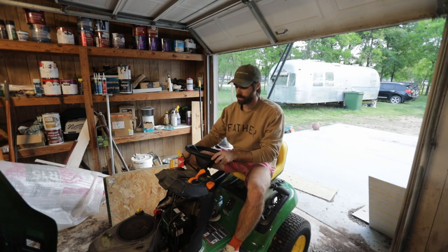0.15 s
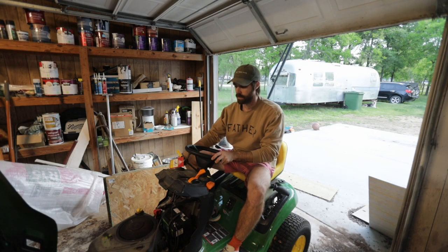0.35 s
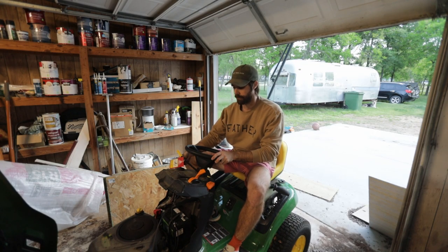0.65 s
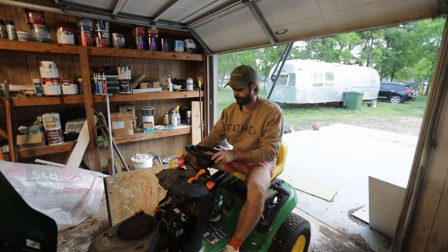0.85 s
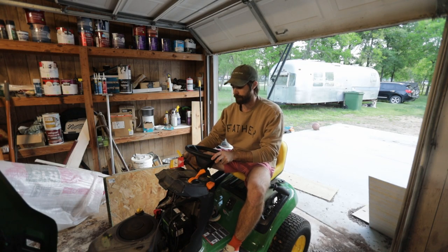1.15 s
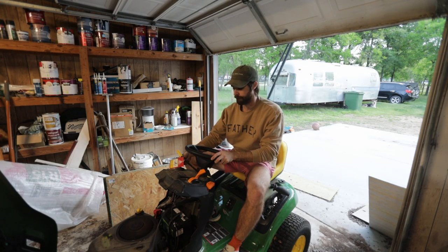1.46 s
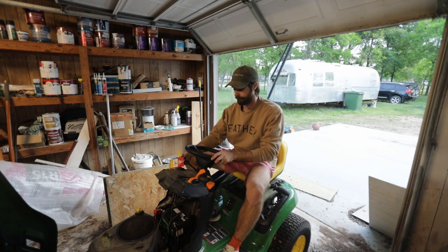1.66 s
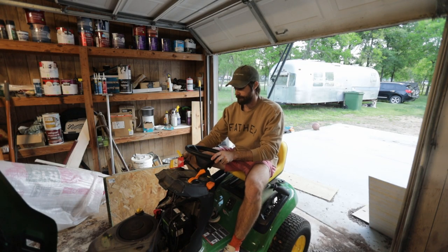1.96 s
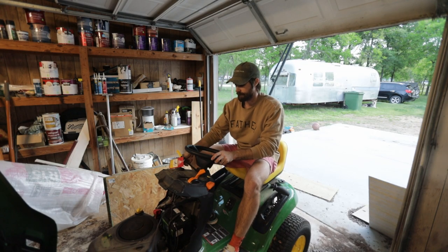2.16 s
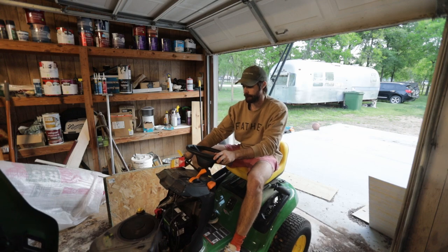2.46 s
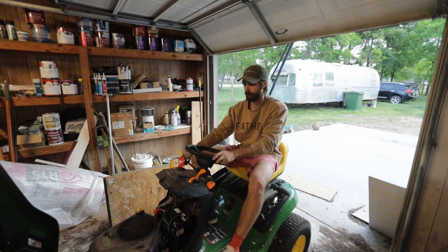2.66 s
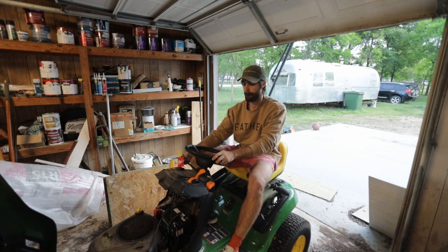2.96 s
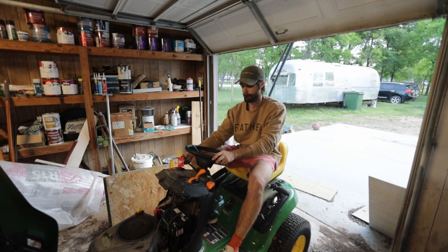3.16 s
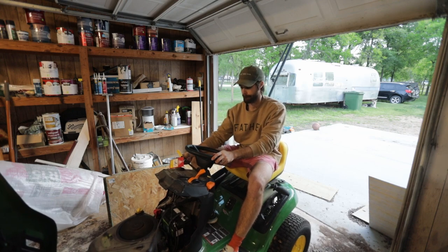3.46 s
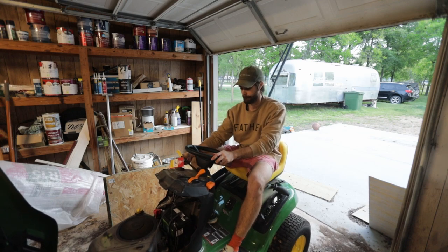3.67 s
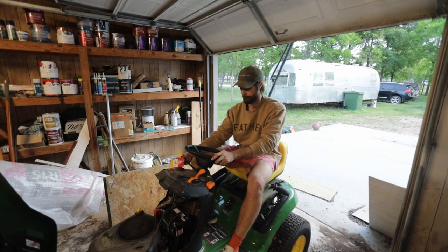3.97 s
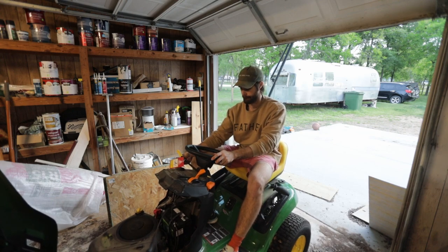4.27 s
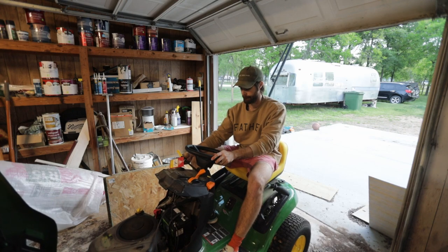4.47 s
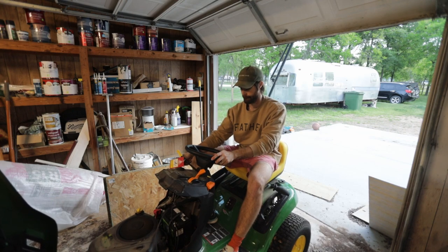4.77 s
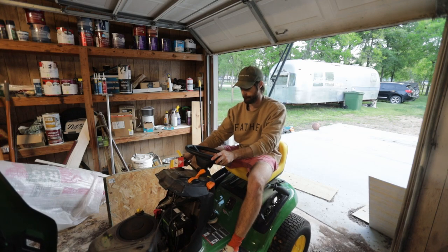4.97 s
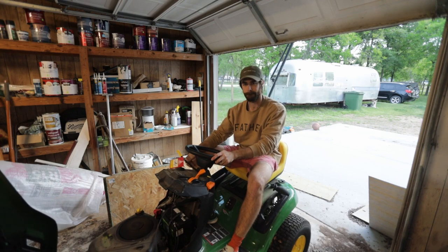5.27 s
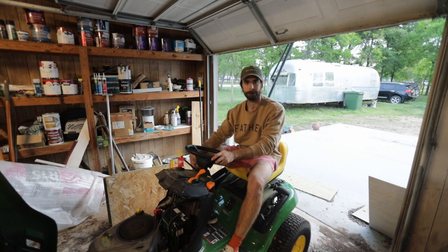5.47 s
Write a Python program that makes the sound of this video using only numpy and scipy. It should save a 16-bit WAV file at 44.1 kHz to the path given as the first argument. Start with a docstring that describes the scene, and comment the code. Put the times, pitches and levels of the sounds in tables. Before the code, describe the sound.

A one-cylinder riding mower is heard closely in an open garage, with short reverberation from shelves and walls and very faint outdoor air. From 0 to 0.4 s, the engine rocks to rest with soft rattles and clacks; tiny creaks follow around 0.5-0.6 s. At 0.7 s the starter slams in with a loud, bright clank and hollow boom. Gritty grinding, whine and small squeaks run until 2.2 s, surging with heavy knocks and low puffs about six times a second. The starter lets go; soft clacks and a weak last knock come at 2.3-2.5 s, then near quiet. A softer clunk at 3.05 s begins a second, similar crank. At about 4.7 s the engine catches with a metallic bang. Rapid low exhaust thuds, about twelve a second, continue to the end with ticking and gradually easing clatter, panels singing briefly stronger around 5.1 s.

```python
"""Cranking and idle of a one-cylinder mower

In an open garage a riding mower's engine rocks to rest from an earlier try, then is cranked twice.
Struck modes give knocks, booms and the bang; trains of brief contacts, filtered by the casing, give gear noise.
Sines give the starter's whine; gas pulses on several paths give the puffs and thuds of the exhaust.
The first go dies away; on the second the engine catches with a bang and settles into a slow, thudding idle."""
import sys
import numpy as np
from scipy import signal
from scipy.fft import rfft, irfft, next_fast_len
from scipy.io import wavfile
from scipy.ndimage import uniform_filter1d

SR = 44100
rng = np.random.default_rng(int(sys.argv[2]) if len(sys.argv) > 2 else 0)


def transcribe(signal):
    """Save signal, clipped to [-1, 1], as a 16-bit WAV file at the path in sys.argv[1]."""
    frames = np.atleast_2d(signal).T
    limited = np.clip(frames, -1, 1)
    pcm = np.round(limited * 32767).astype(np.int16)
    wavfile.write(sys.argv[1], SR, pcm)


N = 247742
TIME = np.arange(N) / SR   # s

# Piston passing over compression: start_s, strength_db
COMPRESSIONS = [(0.198, -14.5), (0.8, -7.5), (1.02, -1.5), (1.201, 0), (1.373, 1), (1.539, 1), (1.705, 0),
                (1.87, 0), (2.036, 0), (2.206, -1.5), (2.474, -8.5), (3.262, -2), (3.453, 2.9),
                (3.624, 0.2), (3.79, 0.8), (3.955, 0.5), (4.119, -0.4), (4.282, -0.5), (4.446, 0.2),
                (4.609, 0.9), (4.731, -1)]
# Solenoid and pinion slamming home: start_s, clank_db, crack_db, boom_db, t60_s
BLOWS = [(0.689, -13.5, -23, -33, 0.14), (0.707, 2, -4, -6.5, 0.077), (0.721, -12.5, -47.5, -4.5, 0.09),
         (3.029, -12.5, -18.5, -22.5, 0.058), (3.047, -4.5, -14, -14, 0.067),
         (3.06, -14.5, -40, -9.5, 0.086)]
# Firings of the engine: start_s, thud_db, tick_db
FIRINGS = [(4.667, -6.5, -16), (4.777, -6, -17), (4.86, -2.5, -19.5), (4.9378, -3.5, -25), (5.013, -3, -23),
           (5.084, -3, -23), (5.161, -6.5, -29), (5.2397, -3.5, -20), (5.3193, -5.5, -27.5),
           (5.4082, -8, -30), (5.5016, -4.5, -25), (5.591, -6, -21.5)]
# Gears clacking across their backlash as the crank rocks or kicks: start_s, clack_db, edge_db
CLACKS = [(0.018, -26, -53), (0.055, -20, -55), (0.118, -30, -53), (0.173, -22.5, -52), (0.211, -44, -42),
          (0.3, -28.5, -65), (0.393, -20, -44), (2.34, -25, -58), (2.366, -24.5, -39), (2.458, -17.5, -41),
          (2.491, -25.5, -45), (2.528, -25.5, -43), (4.666, -12.5, -14), (4.683, -3.5, -10.5),
          (4.746, -12.5, -18.5), (4.78, -30, -25)]
# Starter engaged: start_s, end_s, grind_db
CRANKS = [(0.707, 2.212, -20.5), (3.049, 4.716, -21.5)]
# Flywheel and valve gear coasting: start_s, end_s, level_db, fall_db_per_s (negative rises)
COASTS = [(0, 0.398, -25, 44), (2.24, 2.431, -32, -11)]
# Bearing creaks as the flywheel settles: start_s, pitch_hz, level_db
CREAKS = [(0.494, 9000, -61), (0.562, 3360, -46.5), (0.572, 9850, -54.5), (0.612, 9650, -57.5)]

# Ringing modes of the compression knock: pitch_hz, level_db, t60_s
KNOCK_MODES = [(405, -13, 0.08), (417.6, 0.5, 0.082), (470.6, -21.5, 0.23), (581, -20.5, 0.17)]
# Modes of the intake thump: pitch_hz, level_db, t60_s
INTAKE_MODES = [(147, -18, 0.14), (178.4, -4, 0.083), (243, -11, 0.092)]
# Modes of the flywheel housing: pitch_hz, level_db, t60_s
HOUSING_MODES = [(283, -18.5, 0.39), (351.6, 1.5, 0.29), (541, -36.5, 0.12), (613, -1.5, 0.2),
                 (757, 12.5, 0.057), (1356, -3.5, 0.087)]
# Low modes of the garage, rung by the exhaust: pitch_hz, level_db, t60_s
GARAGE_MODES = [(68, -18, 0.122), (125, -14, 0.19), (189, -12, 0.12), (221, -19, 0.06)]
# Modes of the bodywork, rung by the bang: pitch_hz, level_db, t60_s
BODYWORK_MODES = [(1512, -6, 0.083), (1390, -13, 0.067)]

# Resonances of the engine casing: pitch_hz, width_hz, level_db
CASING = [(398, 60, 6), (812, 270, 3), (1065, 10, -4), (1315, 39, -12.5), (1420, 64, -4.5), (1742, 51, 0.5),
          (2093, 50, 5), (2326, 56, 6), (2640, 17, 3), (3520, 130, -15.5), (3660, 260, -9.5),
          (4400, 110, -2.5), (4800, 31, -25.5)]
# Resonances of the idle clatter: pitch_hz, width_hz, level_db
IDLE_RESONANCES = [(422, 25, 10), (475, 35, -3), (790, 20, -19), (860, 29, -6), (1010, 8.4, 19),
                   (1600, 24, -3), (1710, 23, -13)]
# Resonances of the drive's squeak: pitch_hz, width_hz, level_db
SQUEAK_RESONANCES = [(8700, 510, -7), (9090, 100, 10), (9400, 360, -4)]
# Resonances of the valve gear: pitch_hz, width_hz, level_db
VALVE_RESONANCES = [(4430, 490, 6), (4850, 200, -3), (6900, 560, -1.5), (7900, 410, -13)]
# Panels that sing at idle: pitch_hz, width_hz, level_db
PANEL_RESONANCES = [(800, 21, -8), (881, 24, 0), (992, 8.8, 1)]

# Spectrum of grinding teeth: frequency_hz, density_db_per_hz
GRIND_COLOUR = [(88, -23), (150, -6), (254, -11.5), (361, 2), (414, 2), (559, -1), (1410, -7), (1540, -8.5),
                (1860, -10), (2310, -11.5), (2520, -9), (3000, -19), (3900, -49.5), (6600, -120)]
# Spectrum of the raspy tooth edges: frequency_hz, density_db_per_hz
RASP_COLOUR = [(2300, -24.5), (3100, 4), (3700, 4), (4400, 1.5), (5100, -0.5), (6000, -19), (8000, -28)]
# Spectrum of the treble tooth edges: frequency_hz, density_db_per_hz
TREBLE_COLOUR = [(4000, -21.5), (5800, 3), (8000, -2), (10000, -4), (11000, -15), (15500, -19)]
# Spectrum of the rattle at compression: frequency_hz, density_db_per_hz
RATTLE_COLOUR = [(150, -26.5), (250, -4.5), (442, 4.5), (603, 6.5), (742, -11.5), (1120, -0.5), (1310, 0.5),
                 (1790, -10.5), (2090, -7), (4030, -8.5), (8920, -19.5), (15500, -30.5)]
# Spectrum of the pinion's clank: frequency_hz, density_db_per_hz
CLANK_COLOUR = [(120, -22), (240, -2.5), (340, 5), (620, 2.5), (780, -1.5), (950, -5.5), (1400, 2),
                (2000, -5.5), (4200, -6.5), (6500, -23), (15000, -36.5)]
# Spectrum of bright impact edges: frequency_hz, density_db_per_hz
CRACK_COLOUR = [(500, -53), (2500, 5), (5000, 6), (9500, 2.5), (12000, -7), (15500, -8.5)]
# Spectrum of a backlash clack: frequency_hz, density_db_per_hz
CLACK_COLOUR = [(200, -1.5), (420, 0.5), (650, -4), (1000, -1.5), (1450, -4.5), (1900, -11), (2500, -8.5),
                (4200, -12), (6500, -20.5), (15000, -57)]
# Spectrum of the coasting rattle: frequency_hz, density_db_per_hz
COASTING_COLOUR = [(24, -34), (40, -13), (69, 8), (103, -16), (139, -6), (224, -13.5), (387, -2.5),
                   (577, -3.5), (722, -10), (1380, -5), (1960, -12.5), (2330, -13.5), (3060, -15),
                   (15500, -41.5)]
# Spectrum of the idle clatter: frequency_hz, density_db_per_hz
CLATTER_COLOUR = [(120, -5), (200, -6), (310, -11.5), (422, -4.5), (677, -9.5), (874, -6), (940, -10),
                  (1010, -5.5), (1110, -9.5), (1380, -8), (2800, -16), (4500, -19), (8350, -29.5),
                  (15500, -42.5)]
# Spectrum of air pumped through the muffler: frequency_hz, density_db_per_hz
DRAUGHT_COLOUR = [(40, -14), (55, 4.5), (75, -2), (100, -21), (140, -10), (200, -30.5)]
# Spectrum of the outdoor air: frequency_hz, density_db_per_hz
AIR_COLOUR = [(15, -42.5), (25, -28), (113, 3), (495, -14.5), (537, 2), (684, -21), (1300, -13),
              (1570, -21.5), (1710, -12), (2170, -25.5), (4040, -23), (5430, -33), (15500, -49.5)]

# Reverberation of the garage: frequency_hz, t60_s
GARAGE_T60 = [(100, 0.54), (400, 0.78), (1500, 0.48), (4000, 0.56), (9000, 0.14), (16000, 0.63)]
# Paths of an exhaust pulse from muffler, floor and walls: delay_s, gain
EXHAUST_PATHS = [(0, 0.37), (.0036, -0.69), (.0105, 0.52), (.0178, -0.62), (.0232, .65), (.031, -0.24)]

AIR_DB = -53
MIC_LOW_HZ, CUTOFF_HZ = 38.4, 15750
CLACK_RISE_S, CLACK_T60_S = 0.0043, 0.087

SPIN_UP_S, RUN_DOWN_S = .145, 0.019   # time to full speed; time constant of the fade after release
TEETH_PER_S = 1450   # contact rate approached as each go wears on
RASP_DB, TREBLE_DB = -27, -33   # tooth edges, before the changes below
GRIND_RISE_DB, RASP_RISE_DB, TREBLE_RISE_DB = 2, 23, 27.5   # gained from standstill to full speed
FRESH_S, FRESH_RASP_DB, FRESH_GRIND_DB = .35, 6, -2   # early in each go: thinner and raspier
EASE_S, EASE_DB = .06, 15   # the treble softens just before release
TURN_SWELL_DB, TURN_PEAK = 0.77, .3   # the mesh tightens once a turn; peak as share of the two-turn cycle
STROKE_SWELL_DB, STROKE_PEAK = -0.05, 0.043   # once a cycle; negative dips at that share of the cycle
WHINE_HZ, WHINE_SWING = 1422, 0.0219   # mean mesh pitch, and the share by which it swings with each turn
WHINE_DB, WHINE_START_DB, WHINE_START_S = -34.5, -28.5, 0.23   # steady part, and the starting strain
SQUEAK_AT, SQUEAK_DB, SQUEAK_VARY_DB = (0.266, .74), -24, 3.5   # dry spot, as shares of the cycle

KNOCK_DB, RATTLE_DB, THUMP_DB = -7.5, -11.5, -5   # at a compression of strength 0 dB
KNOCK_GROWTH = 1.3   # dB of knock for each dB of strength
BANG_S = 4.682
RUNS_FROM_S, CLATTER_DB, CLATTER_FALL_DB_PER_S = 4.74, -17, 5.5   # clatter eases as the engine settles
TICK_RISE_S, TICK_T60_S, TICK_EDGE_DB = 0.0058, 0.087, -9.5   # valve tick, and its bright edge
PANEL_DB, SURGE_DB = -34.5, 10   # panels at slow idle, and their gain in the surge
SURGE_S, SURGE_WIDTH_S = 5.08, 0.24


def from_db(db):
    """Level law: decibels to amplitude gain."""
    return 10 ** (np.asarray(db) / 20)


def rms_one(x):
    """Normalisation: scale to unit mean power."""
    return x / np.sqrt(np.mean(x ** 2) + 1e-20)


def at_hz(points, hz):
    """Logarithmic pitch scale: interpolate a table along log frequency."""
    frequency, value = np.transpose(points)
    return np.interp(np.log(hz + 1), np.log(frequency), value)


def flutter(window_s):
    """Random modulation: smoothed noise of rms 1."""
    return rms_one(uniform_filter1d(rng.standard_normal(N), int(window_s * SR) + 1))


def stretch(start, end, fade_s):
    """Exponential decay: a gain held between two times that fades outside them."""
    outside = np.maximum(start - TIME, 0) + np.maximum(TIME - end, 0)
    return np.exp(-outside / fade_s)


def coloured(spectrum, drive=None):
    """Spectral shaping: a drive (else white noise) takes a colour that falls away beyond its ends; rms 1."""
    drive = rng.standard_normal(N) if drive is None else drive
    size = next_fast_len(N)
    hz = np.fft.rfftfreq(size, 1 / SR)
    low_end = 1 + (spectrum[0][0] / (hz + 1)) ** 4
    high_end = 1 + (hz / spectrum[-1][0] / 2) ** 4
    shape = from_db(at_hz(spectrum, hz)) / low_end / high_end
    return rms_one(irfft(rfft(drive, size) * shape, size)[:N])


def resonate(x, peaks):
    """Forced resonance: two-pole bandpass filters in parallel."""
    out = np.zeros(N)
    for hz, width, db in peaks:
        r = np.exp(-np.pi * width / SR)
        poles = [1, -2 * r * np.cos(2 * np.pi * hz / SR), r * r]
        out += from_db(db) * (1 - r * r) / 2 * signal.lfilter([1, 0, -1], poles, x)
    return out


def ring(impulses, hz, t60):
    """Free vibration: each impulse starts a decaying sine."""
    r, w = np.exp(-np.log(1000) / (t60 * SR)), 2 * np.pi * hz / SR
    return signal.lfilter([0, np.sin(w)], [1, -2 * r * np.cos(w), r * r], impulses)


def clicks(times, db):
    """Impulsive excitation: one sample for each event."""
    out = np.zeros(N)
    out[np.clip((np.asarray(times) * SR).astype(int), 0, N - 1)] = from_db(db)
    return out + 1e-18


def strike(times, db, modes, vary_db):
    """Modal excitation: every blow rings each mode with a strength of its own."""
    out = np.zeros(N)
    luck = rng.standard_normal((len(times), len(modes)))
    for k, (hz, mode_db, t60) in enumerate(modes):
        out += ring(clicks(times, db + mode_db + vary_db * luck[:, k]), hz, t60)
    return out


def bursts(times, db, rise_s, t60):
    """Transient envelope: each event swells linearly, then decays exponentially."""
    out = np.zeros(N)
    for s, gain, decay in zip(times, from_db(db), t60 * np.ones(len(times))):
        start = max(int(s * SR), 0)
        age = TIME[:min(N - start, SR // 2)] if start < N else TIME[:0]
        rise = np.minimum(age / rise_s, 1)
        fall = np.exp(-np.log(1000) * np.maximum(age - rise_s, 0) / decay)
        out[start:start + len(age)] += gain * rise * fall
    return out


def contacts(per_s, spread_db, jitter, hiss):
    """Impact noise: an uneven train of touches, each about a millisecond of grit, with rubbing between."""
    count = np.cumsum(per_s * (1 + jitter * flutter(window_s=.005)) / SR)
    strength = from_db(spread_db * np.clip(rng.standard_normal(N), -2, 2))
    touch = np.abs(np.diff(np.floor(count), prepend=0)) * strength
    envelope = signal.lfilter([1], [1, -np.exp(-1 / (.0008 * SR))], touch)
    return rms_one(envelope * rng.standard_normal(N)) + hiss * rng.standard_normal(N)


def chatter(per_s, cycles, spread_db):
    """Free vibration of small parts: each tooth that catches rings one of many for a set count of cycles."""
    pitches = np.geomspace(1150, 6300, num=56)
    born = np.flatnonzero(rng.random(N) < per_s / SR)
    sizes = from_db(spread_db * np.clip(rng.standard_normal(N), -2, 2))[born]
    dealt = rng.integers(0, len(pitches), N)[born]
    out = np.zeros(N)
    for k, hz in enumerate(pitches):
        taps = clicks(born[dealt == k] / SR, 20 * np.log10(sizes[dealt == k]))
        out += ring(taps, hz, t60=cycles / hz)
    return rms_one(out)


def cased(spectrum, drive, peaks, ring_db):
    """Structural transmission: broad colour plus the resonances of a casing."""
    direct = coloured(spectrum, drive)
    return rms_one(direct + from_db(ring_db) * resonate(direct, peaks))


def outdoor_air():
    """Broadband background: faint, steady coloured noise."""
    return from_db(AIR_DB) * coloured(AIR_COLOUR)


def garage(x, wet_db):
    """Diffuse reverberation: echoes off shelves and walls, each band decaying at its own rate."""
    age = TIME[:SR * 3 // 4]
    edges = np.geomspace(60, 18000, 11)
    tail = np.zeros(len(age))
    for low, high in zip(edges, edges[1:]):
        sos = signal.butter(2, [low, high], "band", fs=SR, output="sos")
        band = signal.sosfilt(sos, rng.standard_normal(len(age)))
        tail += band * np.exp(-np.log(1000) * age / at_hz(GARAGE_T60, np.sqrt(low * high)))
    tail *= np.clip(age / 0.0047 - 1, 0, 1)   # silent gap, then a short fade-in
    return x + from_db(wet_db) * signal.fftconvolve(x, tail / np.sqrt(np.sum(tail ** 2)))[:N]


def coasting():
    """Contact noise and friction: flywheel and valve gear rattle softly and a bearing creaks."""
    gain = np.zeros(N)
    for start, end, db, fall in COASTS:
        level = from_db(db - fall * (np.clip(TIME, start, end) - start))
        gain += stretch(start, end, fade_s=0.023) * level
    drive = contacts(400, spread_db=2, jitter=.3, hiss=1.0)
    out = gain * cased(COASTING_COLOUR, drive, CASING, ring_db=-4.0)
    for s, hz, db in CREAKS:
        out += bursts([s], [db], rise_s=.01, t60=.09) * np.sin(2 * np.pi * hz * TIME)
    return out


def clacks():
    """Backlash impact: teeth fly across their play and bounce to rest."""
    s, clack_db, edge_db = np.transpose(CLACKS)
    bounces = contacts(900, spread_db=2.5, jitter=0.24, hiss=1.0)
    bounces = bounces + .5 * chatter(per_s=1600, cycles=95, spread_db=3.0)
    body = cased(CLACK_COLOUR, bounces, CASING, ring_db=-6)
    clack = bursts(s, clack_db, rise_s=CLACK_RISE_S, t60=CLACK_T60_S) * body
    edge = bursts(s, edge_db, rise_s=0.00081, t60=0.096) * coloured(CRACK_COLOUR)
    return clack + edge


def blows():
    """Impact and modal response: solenoid and pinion slam home with a clank and crack; the housing booms."""
    s, clank_db, crack_db, boom_db, t60 = np.transpose(BLOWS)
    drive = contacts(1500, spread_db=4.5, jitter=0.28, hiss=0.84)
    body = cased(CLANK_COLOUR, drive, CASING, ring_db=-2)
    clank = bursts(s, clank_db, rise_s=0.0053, t60=t60) * body
    crack = bursts(s, crack_db, rise_s=0.0002, t60=t60) * coloured(CRACK_COLOUR)
    boom = strike(s + 0.001974, boom_db - 9, HOUSING_MODES, vary_db=2.5)
    return clank + crack + boom


def cycle_starts():
    """Periodicity: a two-turn cycle begins at each compression and whenever the pinion engages."""
    return np.sort([row[0] for row in COMPRESSIONS + CRANKS])


def whine(age, turn):
    """Gear-mesh tone: strongest as the starter gets going, it swings with each turn and wavers."""
    hz = WHINE_HZ * (1 + WHINE_SWING * turn + .014 * flutter(window_s=.014))
    gain = from_db(WHINE_DB) + from_db(WHINE_START_DB) * np.exp(-(age / WHINE_START_S) ** 4)
    waver = 1 + .45 * flutter(window_s=.008)
    return gain * waver * np.sin(2 * np.pi * np.cumsum(hz) / SR)


def squeaks(starts):
    """Friction at resonance: the dry spot of the drive comes round twice in each cycle."""
    s = np.ravel(starts[:-1, None] + np.diff(starts)[:, None] * np.array(SQUEAK_AT))
    db = SQUEAK_DB + SQUEAK_VARY_DB * rng.standard_normal(len(s))
    squeal = rms_one(resonate(rng.standard_normal(N), SQUEAK_RESONANCES))
    return bursts(s - .003, db, rise_s=0.0046, t60=0.077) * squeal


def starter():
    """Gear-mesh excitation: pinion teeth grind, chatter and whine, louder with speed and load; the drive squeaks."""
    starts = cycle_starts()
    cycle = np.interp(TIME, starts, np.arange(len(starts)))
    turn = np.cos(4 * np.pi * (cycle - TURN_PEAK))
    stroke = np.cos(2 * np.pi * (cycle - STROKE_PEAK))
    load = from_db(TURN_SWELL_DB * turn + STROKE_SWELL_DB * stroke)
    cranks = np.array(CRANKS)
    start, end, grind_db = cranks[np.searchsorted(cranks[1:, 0], TIME)].T   # the go under way
    age = np.maximum(TIME - start, 0)
    engaged = (TIME >= start) * stretch(start, end, RUN_DOWN_S)
    lag = 1 - np.minimum(age / SPIN_UP_S, 1)   # share of full speed still to gain
    fresh = np.exp(-age / FRESH_S)
    easing = np.clip((TIME - end) / EASE_S + 1, 0, 1)
    teeth = contacts(TEETH_PER_S * (1 - .8 * fresh), spread_db=3.5, jitter=.08, hiss=.7)
    ringing = teeth + .7 * chatter(per_s=1000, cycles=150, spread_db=4.2)
    bite = from_db(1.4 * flutter(window_s=.011))   # the teeth bite unevenly
    grind_gain = from_db(grind_db - GRIND_RISE_DB * lag + FRESH_GRIND_DB * fresh)
    rasp_gain = from_db(RASP_DB - RASP_RISE_DB * lag + FRESH_RASP_DB * fresh)
    treble_gain = from_db(TREBLE_DB - TREBLE_RISE_DB * lag - EASE_DB * easing)
    mesh = grind_gain * cased(GRIND_COLOUR, ringing, CASING, ring_db=-3)
    mesh += rasp_gain * cased(RASP_COLOUR, ringing, CASING, ring_db=-5.5)
    mesh += treble_gain * coloured(TREBLE_COLOUR, teeth)
    at_speed = lag == 0
    return engaged * (load * bite * mesh + (1 - lag) * whine(age, turn) + at_speed * squeaks(starts))


def exhaust(times, db, width_s):
    """Multipath propagation: a round gas pulse arrives by several paths and rings the garage's low modes."""
    age = TIME[:SR // 50]
    pulse = np.exp(-((age - 2 * width_s) / width_s) ** 2)
    luck = rng.standard_normal((len(times), len(EXHAUST_PATHS)))
    arrivals = np.zeros(N)
    for k, (delay, gain) in enumerate(EXHAUST_PATHS):
        arrivals += gain * clicks(times + delay, db + luck[:, k])
    boom = strike(times + 0.006, db, GARAGE_MODES, vary_db=0.5)
    return boom - signal.fftconvolve(arrivals, pulse)[:N]


def compressions():
    """Impact and gas flow: backlash knocks and rattles, the intake thumps, and later the exhaust puffs."""
    s, db = np.transpose(COMPRESSIONS)
    knock_db, thump_db = KNOCK_DB + KNOCK_GROWTH * db, THUMP_DB + db
    knock = strike(s, knock_db, KNOCK_MODES, vary_db=0.5)
    thump = strike(s + 0.01349, thump_db, INTAKE_MODES, vary_db=1.1)
    body = signal.sosfilt(signal.butter(2, 110, "high", fs=SR, output="sos"), thump - knock)
    puff = exhaust(s + 0.061, thump_db - 15, width_s=0.0027)
    draught = bursts(s + 0.096, knock_db - 18.5, rise_s=0.022, t60=.4) * coloured(DRAUGHT_COLOUR)
    drive = contacts(600, spread_db=4.0, jitter=.3, hiss=1.0)
    rattling = cased(RATTLE_COLOUR, drive, CASING, ring_db=-10)
    rattle = bursts(s, RATTLE_DB + db, rise_s=0.017, t60=0.078) * rattling
    return body + puff + draught, rattle


def bang():
    """Modal response: the first firing kicks the crank and sets the bodywork ringing."""
    return strike([BANG_S], 0, BODYWORK_MODES, vary_db=1)


def idle():
    """Periodic excitation: firings thud, tick at the valve and shake the clattering body; panels sing steadily
    but for one surge."""
    s, thud_db, tick_db = np.transpose(FIRINGS)
    thud = exhaust(s - .002, thud_db, width_s=0.0014)
    valve = rms_one(resonate(rng.standard_normal(N), VALVE_RESONANCES))
    valve = valve + from_db(TICK_EDGE_DB) * coloured(CRACK_COLOUR)
    tick = bursts(s - .001, tick_db, rise_s=TICK_RISE_S, t60=TICK_T60_S) * valve
    running = stretch(RUNS_FROM_S, TIME[-1], fade_s=.013)
    settle = from_db(CLATTER_DB - CLATTER_FALL_DB_PER_S * np.maximum(TIME - RUNS_FROM_S, 0))
    shake = from_db(-3) + bursts(s + 0.015, thud_db + 0.5, rise_s=0.012, t60=0.1)
    drive = contacts(500, spread_db=1, jitter=0.34, hiss=0.71)
    clatter = settle * shake * cased(CLATTER_COLOUR, drive, IDLE_RESONANCES, ring_db=-22)
    surge = np.exp(-((TIME - SURGE_S) / SURGE_WIDTH_S) ** 4)
    singing = rms_one(resonate(rng.standard_normal(N), PANEL_RESONANCES))
    panels = from_db(PANEL_DB + SURGE_DB * surge) * singing
    return thud, tick + running * (clatter + panels)


def scene():
    """Superposition: the mower in the garage, over faint outdoor air."""
    knocks, rattle = compressions()
    thuds, clatter = idle()
    metal = coasting() + clacks() + blows() + starter() + rattle + bang() + clatter
    mower = from_db(0.5) * garage(metal, wet_db=-10.0) + garage(knocks + thuds, wet_db=-12)
    return (outdoor_air() + mower)[None]


def record(dry):
    """Band limits and saturation: the microphone sheds deep bass, rounds the loudest peaks and cuts the top."""
    low_cut = signal.butter(3, MIC_LOW_HZ, "high", fs=SR, output="sos")
    thin = signal.sosfilt(low_cut, dry)
    rounded = thin / (1 + thin ** 6) ** (1 / 6)
    return signal.sosfilt(signal.ellip(10, .2, 70, CUTOFF_HZ, fs=SR, output="sos"), rounded)


dry = scene()
out = record(dry)
transcribe(out)
```